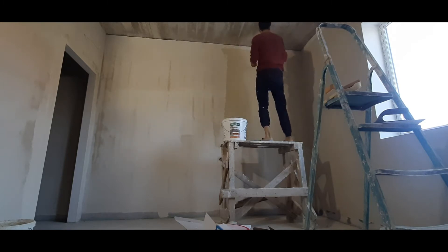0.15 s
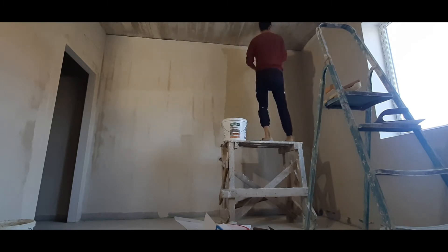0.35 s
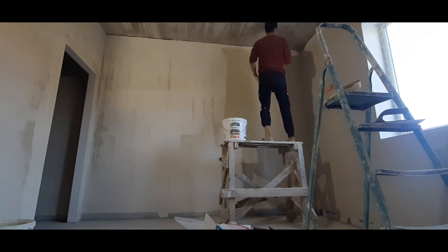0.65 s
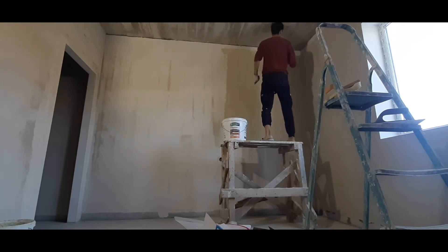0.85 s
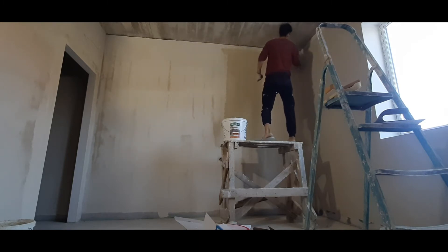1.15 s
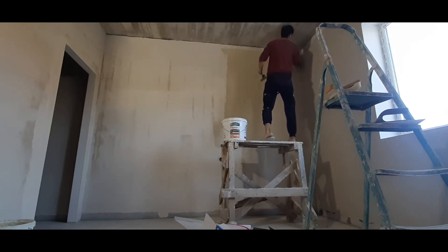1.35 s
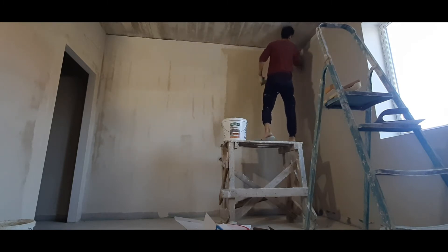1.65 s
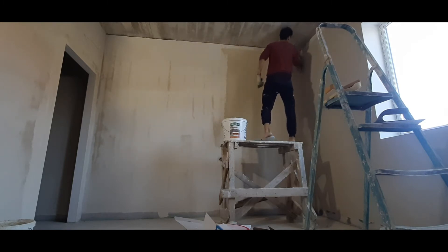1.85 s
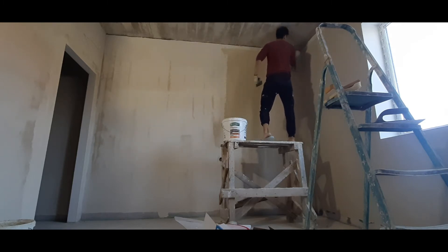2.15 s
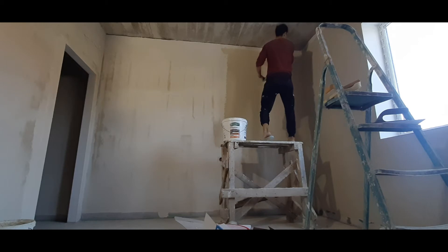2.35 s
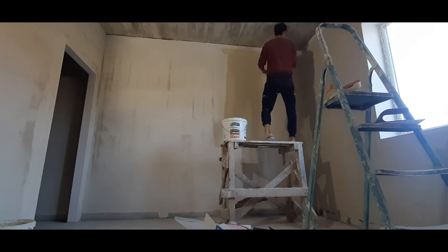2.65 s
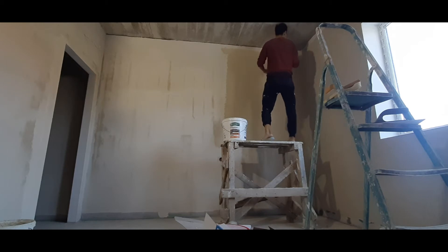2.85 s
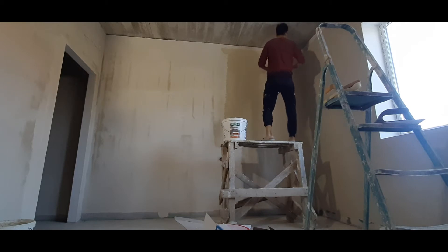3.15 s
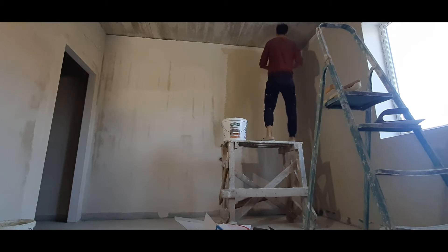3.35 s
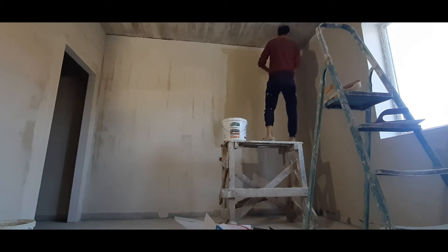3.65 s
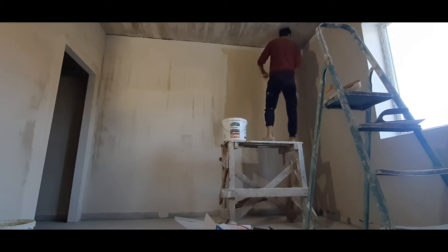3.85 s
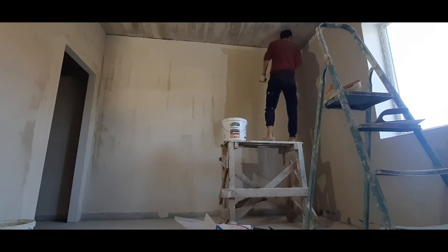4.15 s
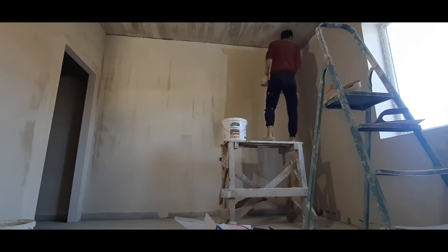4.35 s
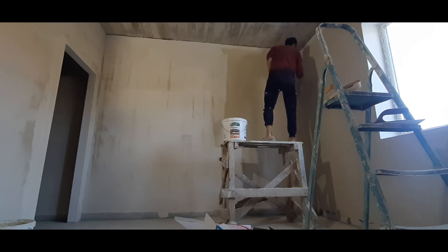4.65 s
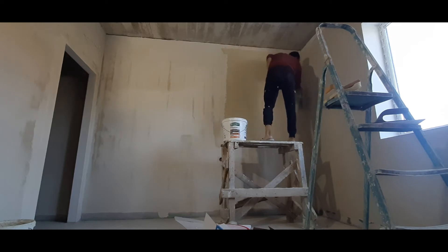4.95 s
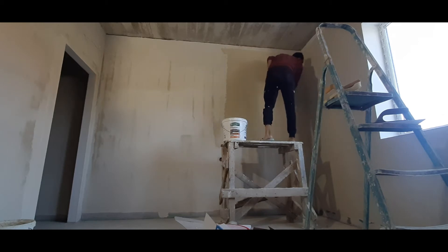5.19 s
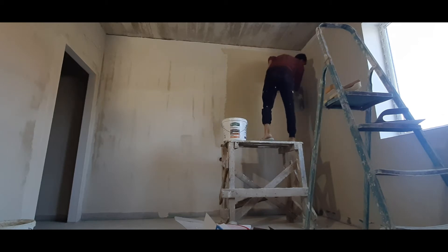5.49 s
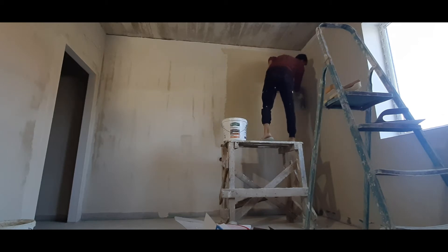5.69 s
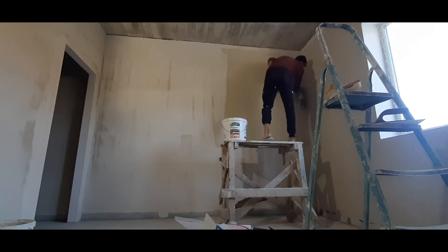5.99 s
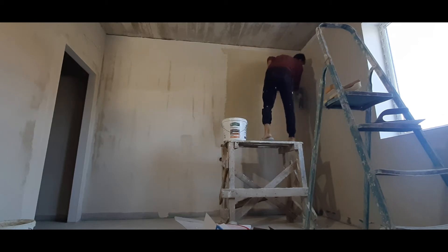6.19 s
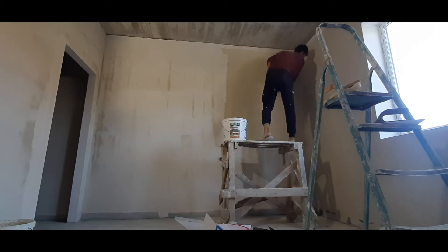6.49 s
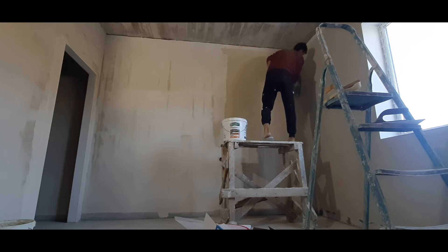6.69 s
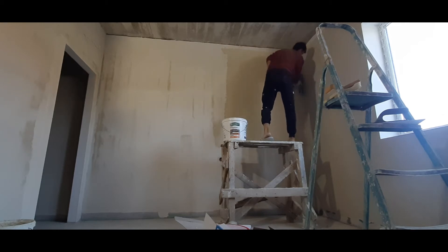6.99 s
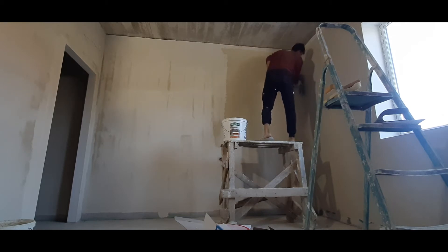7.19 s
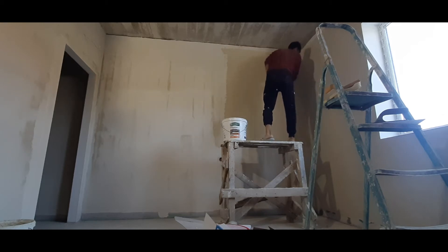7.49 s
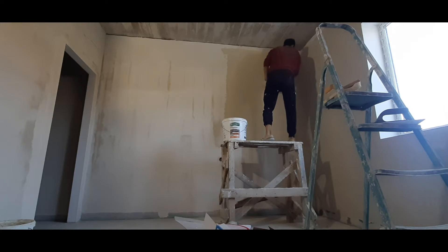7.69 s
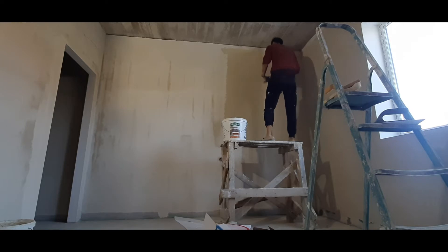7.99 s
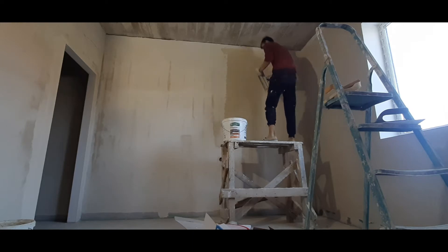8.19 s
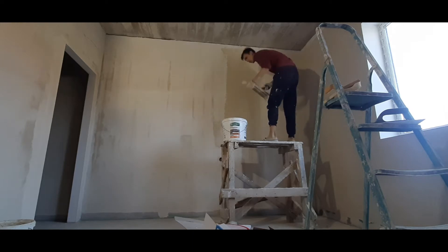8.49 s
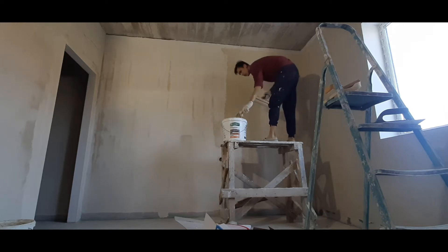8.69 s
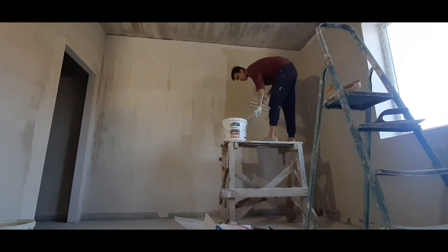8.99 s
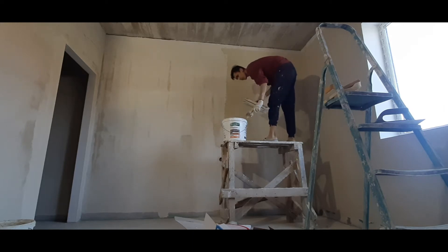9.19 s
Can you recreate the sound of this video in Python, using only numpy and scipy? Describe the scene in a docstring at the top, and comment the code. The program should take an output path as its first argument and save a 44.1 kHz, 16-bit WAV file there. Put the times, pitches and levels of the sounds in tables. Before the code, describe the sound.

A steel trowel spreads plaster on a wall in short, gritty scrapes with pauses between, heard from a few metres away in a bare, echoing room. Now and then it taps and scrapes a second tool, which rings. Near the end it knocks hollowly on a plastic bucket and a trestle rumbles softly. A low electrical hum and faint street rumble continue throughout.

```python
"""Gritty scrapes echo through a bare room: a steel trowel spreads plaster high on a wall, some metres from
a camera's two microphones. Sand under the blade shakes wall and steel, and most of the sound arrives as
reverberation. Now and then the trowel taps and scrapes a second tool, which rings; near the end it knocks
on a plastic bucket. A trestle sways, and mains hum and faint street rumble stay throughout."""
import sys
import numpy as np
from scipy import signal
from scipy.fft import rfft, irfft, next_fast_len
from scipy.io import wavfile
from scipy.ndimage import uniform_filter1d, map_coordinates

SR = 44100
rng = np.random.default_rng(int(sys.argv[2]) if len(sys.argv) > 2 else 0)


def bounce(signal):
    """Save signal as a 16-bit WAV file at the path given by the first command-line argument."""
    frames = np.transpose(np.atleast_2d(signal))
    limited = np.clip(frames, -1, 1)
    pcm = np.round(limited * 32767).astype(np.int16)
    wavfile.write(sys.argv[1], SR, pcm)


N = 411894
LEAD = SR // 4  # samples played ahead, so that the room already rings at the start
T = (np.arange(N + LEAD) - LEAD) / SR


def amp(db):
    return 10 ** (np.asarray(db) / 20)


def unit(x):
    return x / np.sqrt(np.mean(x ** 2) + 1e-20)


def along(points, hz):
    """Read (Hz, value) points on a log frequency axis."""
    f, v = np.transpose(points)
    return np.interp(np.log(hz + 1), np.log(f + 1), v)


def filtered(x, response):
    """x through a response given as a function of Hz."""
    size = next_fast_len(x.shape[-1] + SR // 2)
    return irfft(rfft(x, size) * response(np.fft.rfftfreq(size, 1 / SR)), size)[..., :x.shape[-1]]


def coloured(x, spectrum):
    """x shaped by (Hz, dB) points."""
    return filtered(x, lambda hz: amp(along(spectrum, hz)))


def resonant(modes):
    """The response of (Hz, width Hz, dB) modes."""
    return lambda f: sum((-1) ** k * amp(db) * 1j * f * width / (hz * hz - f * f + 1j * f * width)
                         for k, (hz, width, db) in enumerate(modes))


def wobble(rate):
    """A smooth random curve, rate knots a second."""
    knots = rng.standard_normal(int(len(T) * rate / SR) + 4)
    return map_coordinates(knots, [np.arange(len(T)) * rate / SR])


def diffuse(pair, spacing_m=0.17):
    """Two signals become left and right, as alike as sound from all sides is at spaced microphones."""
    turn = lambda hz: np.arccos(np.clip(0.92 * np.sinc(2 * hz * spacing_m / 343), -1, 1)) / 2
    mid, side = filtered(pair, lambda hz: np.array([np.cos(turn(hz)), np.sin(turn(hz))]))
    return np.array([mid + side, mid - side])


def grains(rate, spread_db):
    """Sand crushed under the edge: rate random clicks a second, of scattered size."""
    chance, side = rng.random((2, len(T)))
    size = amp(spread_db * np.clip(rng.standard_normal(len(T)), -2, 2))
    return (chance < rate / SR) * np.sign(side - .5) * size


def blows(table, modes, rise_s):
    """Each blow is a short click and the struck thing's modes, at new strengths."""
    out, t = np.zeros(len(T) + SR), np.arange(SR // 2) / SR
    for start, db, click_db in table:
        ring = sum(amp(level + rng.normal(0, 1.5) - 60 * t / t60) * np.sin(2 * np.pi * hz * t)
                   for hz, level, t60 in modes)
        click = amp(click_db - 60 * t / 0.022) * rng.standard_normal(len(t))
        out[LEAD + round(start * SR):][:len(t)] += amp(db) * ring * (1 - np.exp(-t / rise_s)) + click
    return out[:len(T)]


# Room tone at the microphones. Each row: frequency in Hz, relative density in dB.
ROOM_TONE = [(15, -47.5), (28, -25.5), (45, -18), (75, 0), (125, -0.5), (165, -11), (260, -4), (370, -13.5),
             (480, -26), (750, -31), (1500, -32.5), (3000, -35), (5500, -30), (7700, -27), (9300, -36),
             (12500, -35.5), (15500, -40.5)]

def room_tone():
    """Street rumble through the window and the hiss of the microphones."""
    return amp(-61.5) * unit(diffuse(coloured(rng.standard_normal((2, len(T))), ROOM_TONE)))


def mains_hum(hz=100.2, level_db=-46):
    """Twice the mains frequency, wavering a little, stronger at the right microphone."""
    level = amp(level_db + .6 * wobble(2.84) + 0.58 * wobble(16))
    return np.sqrt(2) * level * np.sin(2 * np.pi * hz * T) * amp([[-.9], [.9]])


# Shifts of weight on the trestle. Each row: time in seconds, level in dB.
WEIGHT_SHIFTS = [(.4, -52), (2.208, -58), (3.8, -68), (5.0, -65), (6.5, -62), (7.57, -64), (8.71, -33),
                 (9.0, -39)]

def trestle(rise_s=.06, t60_s=1.4, rest_db=-73.5):
    """Each shift of weight sends a deep rumble through the floor, alike at both microphones."""
    rumble = filtered(rng.standard_normal(len(T)), resonant([(40, 9.2, -2), (61.3, 19, 0)]))
    level = amp(rest_db)
    for at, db in WEIGHT_SHIFTS:
        age = np.maximum(T - at + rise_s, 0)
        level = level + amp(db - 60 * age / t60_s) * np.minimum(age / rise_s, 1)
    return level * unit(rumble)


# The bare room around the microphones. Each row: frequency in Hz, 60 dB decay time in seconds.
ROOM_DECAY = [(100, 0.88), (400, 1), (1040, 0.96), (2200, 0.85), (3000, 0.76), (7280, 0.55), (14000, 0.33)]

def reverberation(x):
    """Bare walls return a diffuse tail, treble dying first; the tool moves, so the echoes change."""
    hop, delay = SR // 8, 180  # samples; the first echo comes 4 ms late
    hz, t = np.fft.rfftfreq(256, 1 / SR), np.arange(400) * 128 / SR
    fade = amp(-60 * t / along(ROOM_DECAY, hz)[:, None])
    fade /= np.linalg.norm(fade, axis=1, keepdims=True)  # the same energy at every frequency
    window = np.sin(np.pi * np.arange(2 * hop) / (2 * hop))
    out = np.zeros((2, len(x) + 3 * SR))
    x = np.pad(x, (hop, 3 * hop))
    for at in range(0, len(T) + hop, hop):
        real, imag = rng.standard_normal((2, 2, *fade.shape))
        tail = signal.istft((real + 1j * imag) * fade, nperseg=256)[1]
        piece = x[at:at + 2 * hop] * window
        wet = signal.fftconvolve(piece[None], tail / np.linalg.norm(tail[0]), axes=1)
        out[:, at:at + wet.shape[1]] += wet
    return diffuse(out[:, hop - delay:][:, :len(T)])


def blade_shiver():
    """One mode of the blade rings faintly while the tool is carried."""
    level = np.interp(T, (8.3, 8.63, 8.68), amp([-68, -58, -120]), left=0)
    return level * unit(filtered(rng.standard_normal(len(T)), resonant([(1650, 45, 0)])))


# The bucket and the boards under it. Each row: mode in Hz, level in dB, 60 dB decay time in seconds.
BUCKET_MODES = [(106.6, -5.5, 0.58), (245, 1, 0.087), (283.4, 2.5, 0.118), (354.4, 7, 0.093),
                (580, -12, 0.035), (858, -2, 0.073), (1880, -28, .05)]
# Knocks, away from the wall. Each row: start in seconds, ring level in dB, click level in dB.
BUCKET_KNOCKS = [(8.672, -15.5, -25.5), (8.75, -18.5, -50), (8.846, -15.5, -37.5), (8.99, -20.5, -50.5)]

def bucket_knocks():
    """The trowel strikes the plastic bucket, which answers low and hollow."""
    return blows(BUCKET_KNOCKS, BUCKET_MODES, rise_s=0.0054)


# The second tool's free steel. Each row: mode in Hz, level in dB, 60 dB decay time in seconds.
TOOL_MODES = [(401, 1, 0.24), (800, -5, 0.17), (1290, -16, 0.28), (1750, -30.5, .6), (1980, -19, .2),
              (3840, -32, 0.1)]
# Taps, facing the microphones. Each row: start in seconds, ring level in dB, click level in dB.
TOOL_TAPS = [(2.775, -31, -52), (3.568, -23, -51.5), (3.605, -25.5, -55), (3.66, -28.5, -56),
             (7.342, -39, -60), (9.0, -24, -51.5), (9.025, -24, -39), (9.1, -23, -42.5)]

def tool_taps():
    """The trowel taps the second tool, which rings freely."""
    return blows(TOOL_TAPS, TOOL_MODES, rise_s=0.0027)


# Passes over the second tool. Each row: start and end in seconds, ring and hiss in dB re the grit gain.
CLEANING_PASSES = [(2.778, 3.192, -8.5, -17), (3.691, 3.902, -17, -11), (7.836, 8.348, -29, -9),
                   (8.954, 9.252, -10, -7)]

def blade_cleaning(grit_gain):
    """The blade is scraped clean: sand rings the second tool, and steel hisses on steel."""
    free_steel = resonant([(hz, np.log(1000) / np.pi / t60, db) for hz, db, t60 in TOOL_MODES])
    sand = grains(rate=3800, spread_db=1)
    ring_gain, hiss_gain = grit_gain * sum(np.outer(amp(levels), (T > start) * (T < end))
                                           for start, end, *levels in CLEANING_PASSES)
    hiss = filtered(grains(rate=8300, spread_db=3), resonant([(12500, 6000, 0)]))
    ring = filtered(ring_gain * sand, free_steel) / np.std(filtered(sand, free_steel))
    return ring + hiss_gain * unit(hiss)


# The blade's bending modes, damped by plaster. Each row: frequency in Hz, width in Hz, level in dB.
BLADE_MODES = [(1113, 420, -1), (1680, 390, 4), (1952, 360, 7), (2300, 1290, -1.5)]

def blade_ring():
    """Sand drives the blade's modes; wet plaster damps the higher ones."""
    sand = grains(rate=4000, spread_db=4)
    return unit(filtered(sand, lambda hz: resonant(BLADE_MODES)(hz) / (1 + (hz / 2900) ** 6)))


# Catches up on the wall. Each row: start in seconds, ring level in dB, click level in dB.
RIDGE_CATCHES = [(.308, -32, -35.5), (1.86, -44.5, -65.5), (3.688, -33, -24.5), (3.11, -27.5, -52),
                 (4.98, -38, -44), (6.098, -36.5, -49), (6.222, -23, -47), (7.342, -22, -49)]

def ridge_catches():
    """The edge catches on a ridge of plaster and jolts the damped blade."""
    modes = [(hz, db, np.log(1000) / np.pi / width) for hz, width, db in BLADE_MODES]
    return blows(RIDGE_CATCHES, modes, rise_s=.0015)


# Hiss at the blade's edge. Each row: frequency in Hz, relative density in dB.
GRIT_SPECTRUM = [(1200, -21.5), (2500, 0), (3800, 1.5), (6000, -2.5), (7900, -1), (9200, -11.5),
                 (12300, -7), (15000, -13), (17000, -21.5)]

def grit_hiss(gain, fizz_hz=9200, knee_db=-50.5, slope=0.27):
    """Dense grains hiss; light brushing is duller, as the top fades when gain is under the knee."""
    grit = coloured(grains(rate=9000, spread_db=0.5), GRIT_SPECTRUM)
    fizz = filtered(grit, lambda hz: 1 / (1 + (fizz_hz / (hz + 1)) ** 8))
    dullness = 1 - np.minimum(gain / amp(knee_db), 1) ** slope
    return unit(grit - fizz * dullness)


def stroke(lands, hardest, lifts, pressure_db, ring_db, hiss_db, swell_db, shape, bite_db, settle):
    """Gains of thud, wall, blade and grit: the edge bites, presses, then eases off and lifts."""
    t = T[(T > lands) & (T < lifts)]
    bite = bite_db * np.exp(-(t - lands) / .012)
    fastest = max(hardest - 0.038, lands + 0.0039)  # speed peaks ahead of pressure
    swell = lambda top: bite - swell_db * np.clip((top - t) / (top - lands), 0, 1) ** shape
    ease = lambda top: -26.5 * np.clip((t - top) / (lifts - top), 0, 1) ** 1.85
    wall_db = pressure_db + swell(hardest) + ease(hardest)
    thud_db = -27 + 1.48 * (wall_db + 20)  # the thud grows faster than the pressure
    blade_db = ring_db + 0.89 * swell(fastest) + ease(fastest)
    grit_db = hiss_db + 0.76 * swell(fastest) + ease(fastest)
    touch = np.clip((t - lands) / max(settle, .002), 0, 1) * np.clip((lifts - t) / .02, 0, 1)
    return touch * amp([thud_db, wall_db, blade_db, grit_db])


# The low thud and the wall's rasp under the blade. Each row: frequency in Hz, relative density in dB.
THUD_SPECTRUM = [(60, -41), (110, -11), (170, -1), (260, 1), (400, -9), (800, -53.5)]
WALL_SPECTRUM = [(150, -42.5), (300, -1), (420, -2), (700, -1), (1200, -6), (2000, -25), (4000, -60)]
# Blade contacts, some metres from the microphones. Each row: landing, hardest moment and lift in
# seconds; pressure, ring, hiss and swell in dB; swell shape (1 steady, more rises early then levels);
# landing bite in dB; settling time in seconds.
TROWEL_STROKES = [ (-0.2, -0.045, 0.016, -39, -40.5, -45.5, 2, 1.5, -5.5, .01),
                  (0.093, 0.251, 0.37, -61, -54, -52.5, 10, 3.7, 2, .02),
                  (0.277, 0.299, 0.34, -35.5, -39, -56, 2, 1.8, 4.5, .01),
                  (0.303, 0.357, 0.52, -30, -31.5, -32.5, -2.5, 2.6, 6, 0.0033),
                  (0.502, 0.804, 0.87, -79, -69, -65.5, -13.5, 0.92, -1, .03),
                  (1.003, 1.196, 1.293, -85, -73, -59.5, 17, 0.88, 1, .04),
                  (1.27, 1.408, 1.43, -85.5, -81, -67.5, 2.5, 1.5, -3.5, .03),
                  (1.796, 1.83, 2, -75, -73, -65.5, 1.5, 1.5, 2, .02),
                  (1.834, 1.864, 1.88, -42.5, -64, -63.5, 5, 1.4, 3, .015),
                  (1.965, 2.435, 2.567, -25.5, -29, -35.5, 20.5, 4.2, -1.5, .02),
                  (2.751, 3.1, 3.168, -40.5, -35, -36.5, 1, 0.81, 14.5, .01),
                  (3.551, 3.664, 3.67, -28, -36.5, -42.5, 9, 1.3, 14.5, .008),
                  (3.675, 3.76, 3.863, -32.5, -28, -26.5, 2.5, 1.4, 4.5, .008),
                  (4.104, 4.256, 4.25, -80, -72, -65.5, 1, 2, 3, .03),
                  (4.64, 4.75, 4.86, -85, -85, -70.5, 5.5, 1.5, 1, .03),
                  (4.771, 4.813, 4.94, -71, -66, -50.5, 4, 1.286, 0, .03),
                  (4.927, 4.963, 5.5, -50, -54, -49, 3, 1.5, 1.5, .02),
                  (4.965, 5.17, 5.24, -22, -28.5, -36, 13.5, 0.79, 9.5, .012),
                  (5.5, 5.599, 5.6, -82, -79, -65.5, 3, 1.5, -1, .03),
                  (5.967, 6.092, 6.13, -48, -49, -51.5, 10, 1.3, 1, .04),
                  (6.091, 6.217, 6.25, -41.5, -35, -44, 7, 1.1, 8, .004),
                  (6.214, 6.413, 6.5, -22, -23, -33, 12, 1.12, 9.5, 0.0045),
                  (7.122, 7.22, 7.34, -58.5, -56.5, -63.5, -3.5, 1.5, 15, .015),
                  (7.302, 7.352, 7.37, -48, -40, -51, 4, 1.2, 2, .02),
                  (7.336, 7.526, 7.62, -18.5, -23.5, -32, 23, 1.22, 9, .006),
                  (7.828, 8.023, 8.072, -37, -29.5, -26, 17, 1.1, 2, .025),
                  (8.089, 8.2, 8.33, -45, -44, -41, -1, 0.94, 1, .03),
                  (8.454, 8.626, 10, -70, -68, -66, 3.5, 1.5, -2.5, .03),
                  (8.67, 8.701, 8.77, -29.5, -37, -38.5, -1, 1.5, 17, .008),
                  (8.831, 8.889, 8.98, -24, -30, -41, 8.5, 1.4, 1.5, .01),
                  (8.945, 9.109, 9.2, -25, -23.5, -31, 20.5, 1.2, 1, .02), ]

def trowel():
    """Sand grains drive the wall, the steel and a bright hiss, each as hard as the stroke asks."""
    gains = np.zeros((4, len(T)))
    for lands, hardest, lifts, *touch in TROWEL_STROKES:
        gains[:, (T > lands) & (T < lifts)] += stroke(lands, hardest, lifts, *touch)
    gains *= amp(1.69 * wobble(28))  # the blade judders over the uneven coat
    thud_gain, wall_gain, blade_gain, grit_gain = gains
    thud = thud_gain * unit(coloured(grains(rate=1700, spread_db=2), THUD_SPECTRUM))
    wall = wall_gain * unit(coloured(grains(rate=2500, spread_db=3), WALL_SPECTRUM))
    blade = blade_gain * blade_ring()
    grit = grit_gain * grit_hiss(grit_gain)
    return thud + wall + blade + grit + blade_cleaning(grit_gain)


def scene():
    """From across the room, scrapes are mostly echo; taps and knocks, off the wall, are more direct."""
    scrape = trowel() + ridge_catches() + blade_shiver()
    struck = tool_taps() + bucket_knocks()
    direct = amp(-11) * scrape + amp(-3.5) * struck
    direct = np.array([np.roll(direct, 5), direct])  # the right microphone is a little nearer
    echo = reverberation(amp(-0.94) * scrape + amp(-5.0) * struck)
    return (direct + echo + mains_hum() + room_tone() + trestle())[:, LEAD:]


def suppress_treble(x, knee_db=-69.5, depth_db=8, slope=2.21):
    """The camera turns its treble down when little is there."""
    treble = filtered(x, lambda hz: 1 / (1 + (2500 / (hz + 1)) ** 4))
    power = uniform_filter1d(np.mean(treble ** 2, axis=0), size=1800)
    level_db = 10 * np.log10(np.abs(power) + 1e-12)
    gain_db = np.clip(slope * (level_db - knee_db), -depth_db, 0)
    return x + treble * (amp(gain_db) - 1)


# Balance of the camera's microphones. Each row: frequency in Hz, left minus right in dB.
MIC_BALANCE = [(60, -2), (300, -1), (700, -3), (1650, -0.5), (5000, -3), (9000, -2), (15000, 4)]

def record(dry, top_hz=15800):
    """Two slightly unequal microphones, then treble suppression and a band limit."""
    pair = filtered(dry, lambda hz: amp(np.outer([.5, -.5], along(MIC_BALANCE, hz))))
    return filtered(suppress_treble(pair), lambda hz: hz < top_hz)


dry = scene()
out = record(dry)
bounce(out)
```